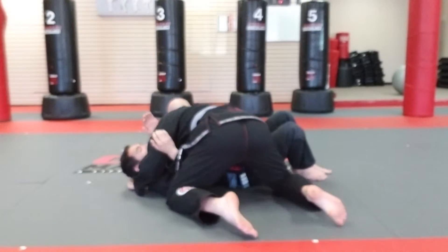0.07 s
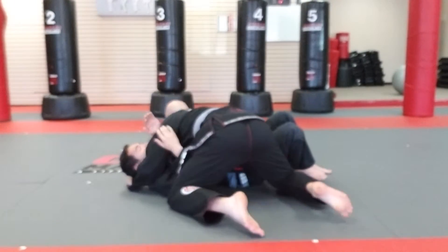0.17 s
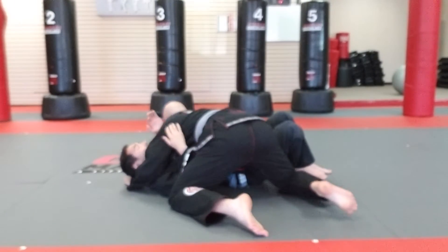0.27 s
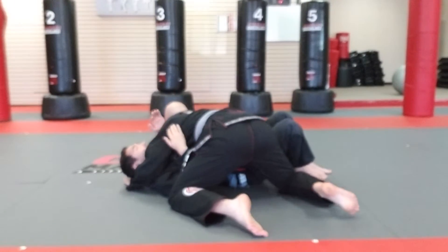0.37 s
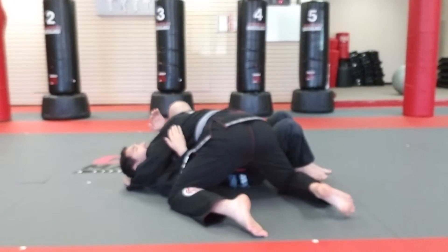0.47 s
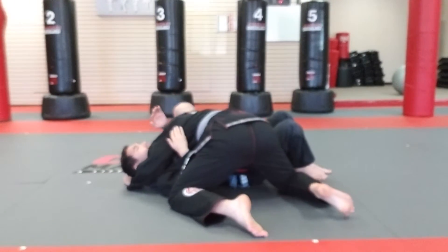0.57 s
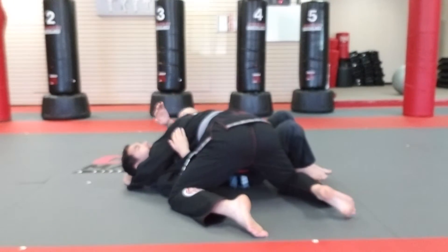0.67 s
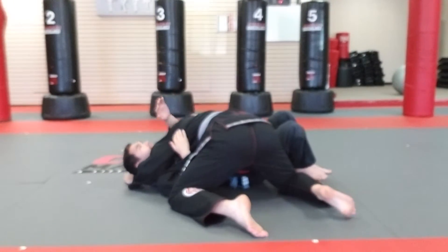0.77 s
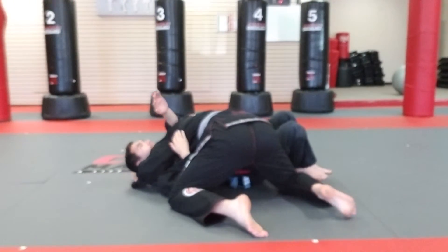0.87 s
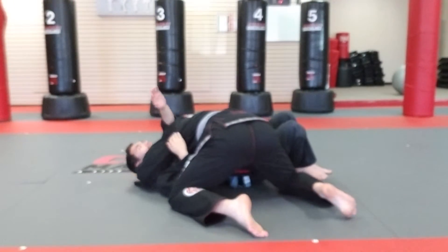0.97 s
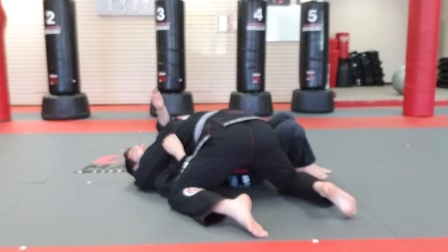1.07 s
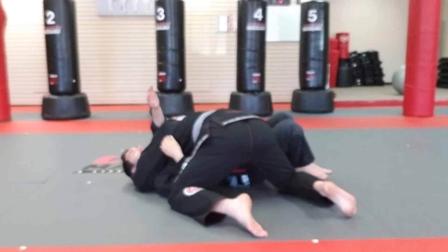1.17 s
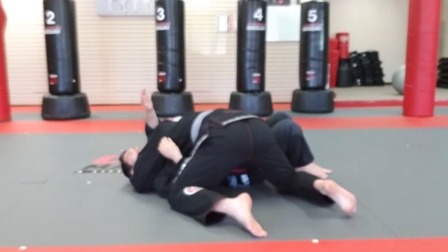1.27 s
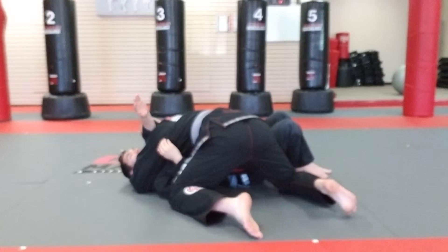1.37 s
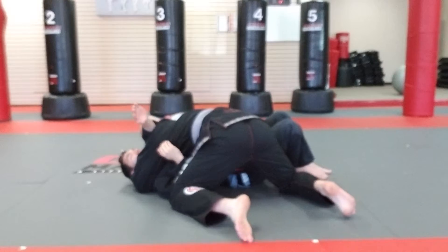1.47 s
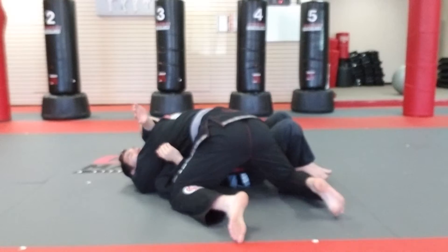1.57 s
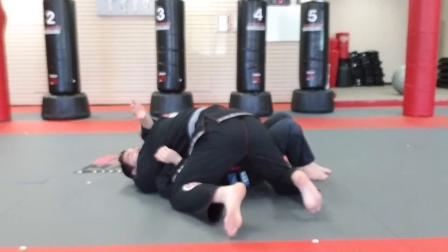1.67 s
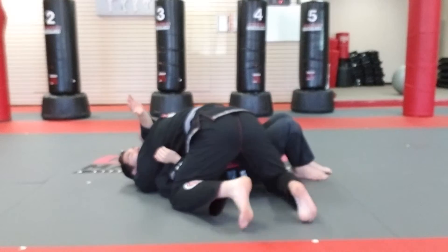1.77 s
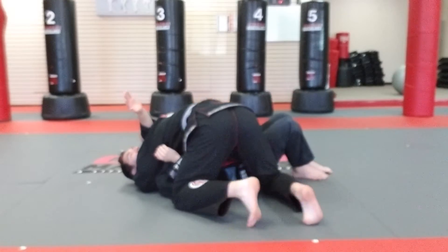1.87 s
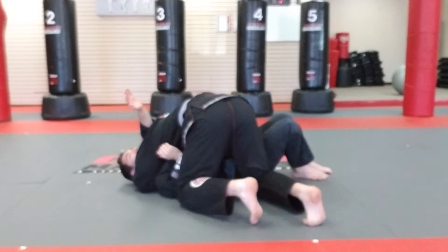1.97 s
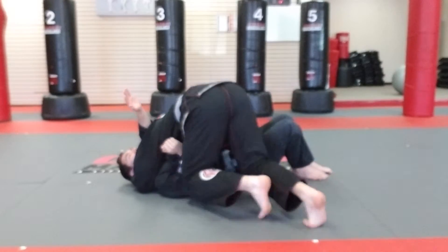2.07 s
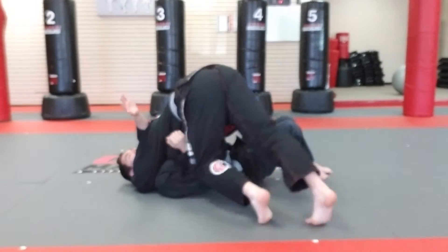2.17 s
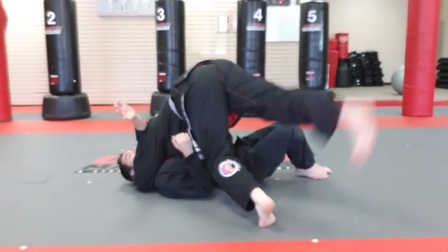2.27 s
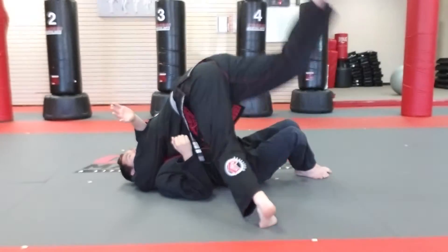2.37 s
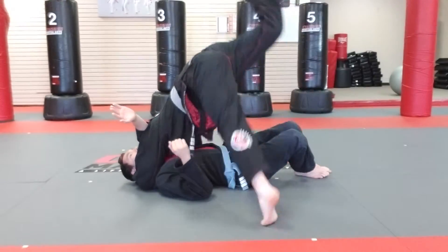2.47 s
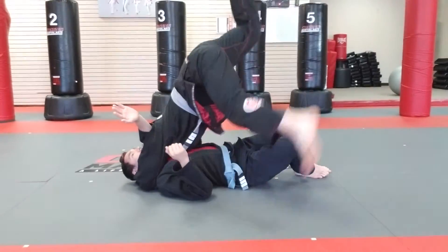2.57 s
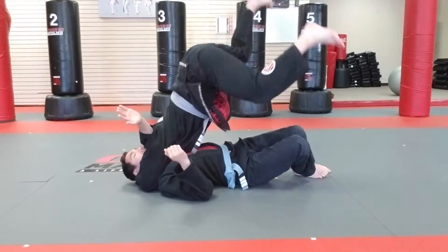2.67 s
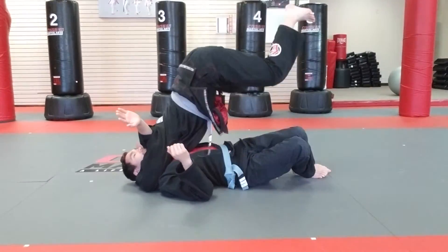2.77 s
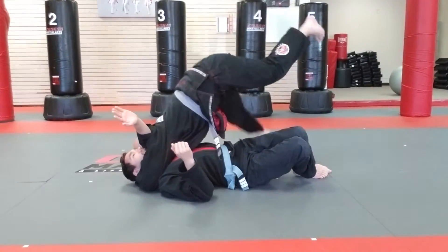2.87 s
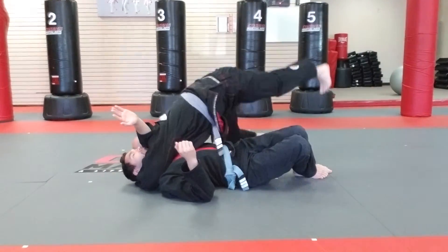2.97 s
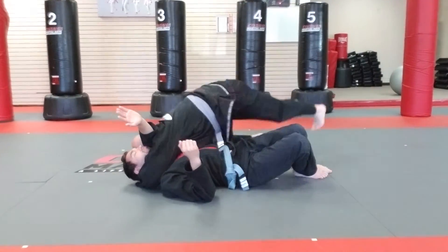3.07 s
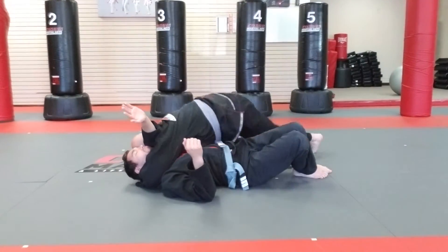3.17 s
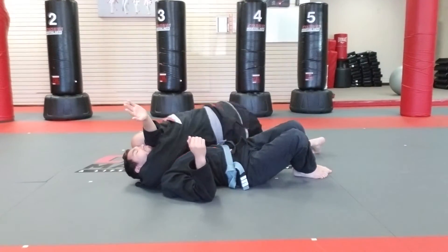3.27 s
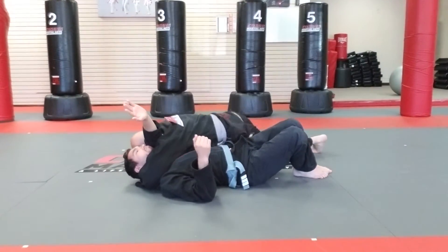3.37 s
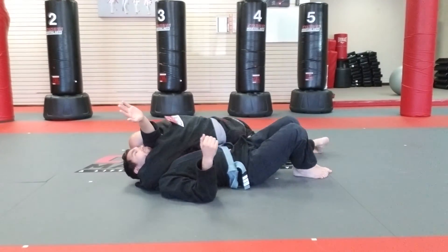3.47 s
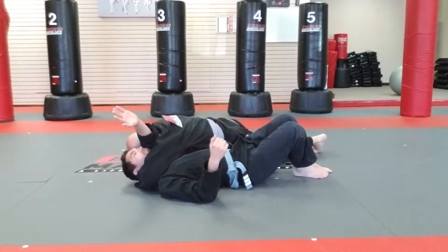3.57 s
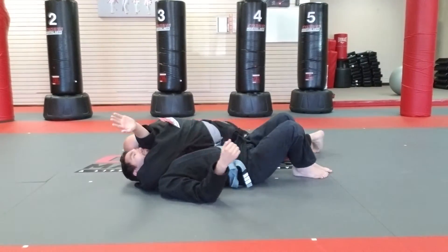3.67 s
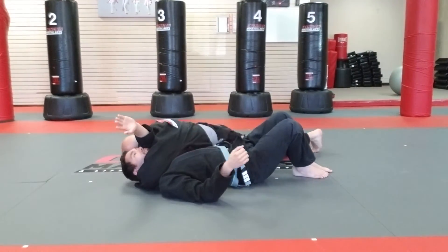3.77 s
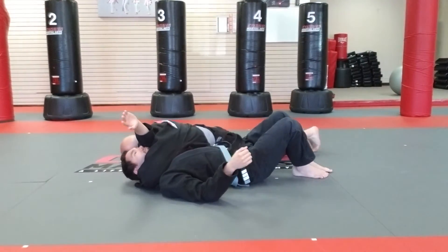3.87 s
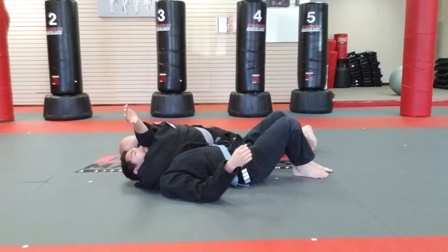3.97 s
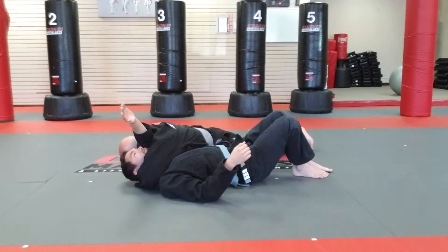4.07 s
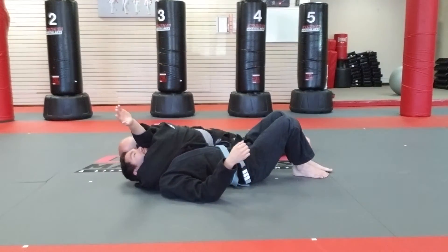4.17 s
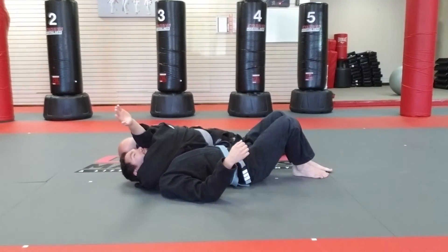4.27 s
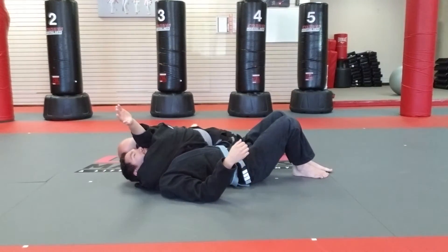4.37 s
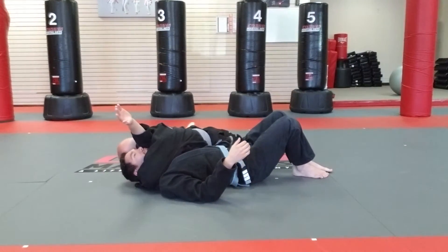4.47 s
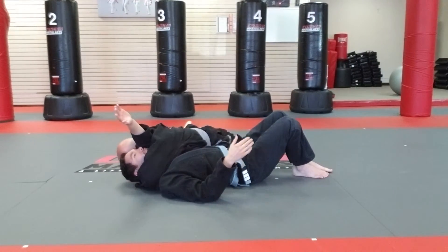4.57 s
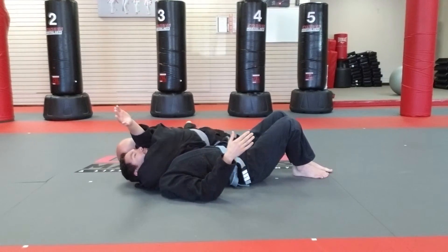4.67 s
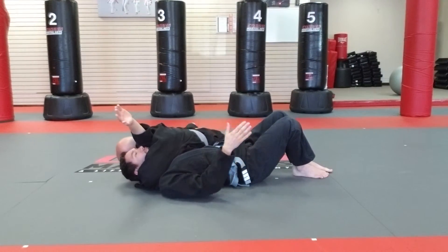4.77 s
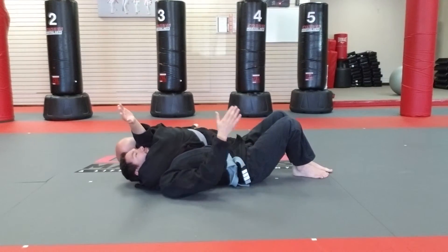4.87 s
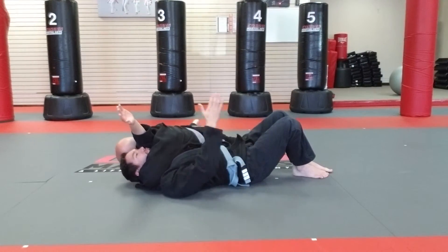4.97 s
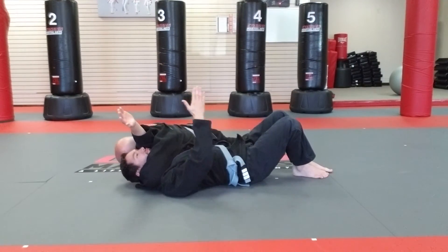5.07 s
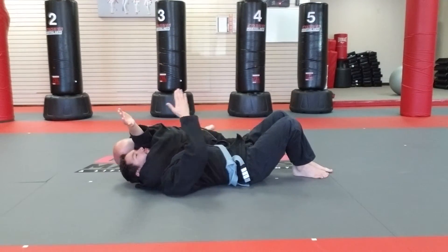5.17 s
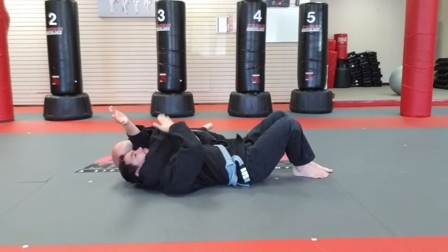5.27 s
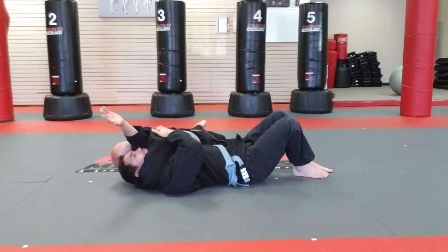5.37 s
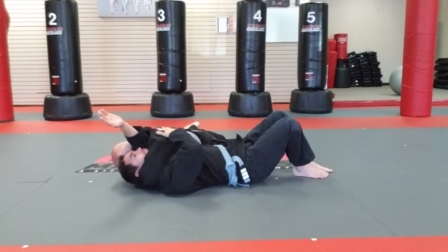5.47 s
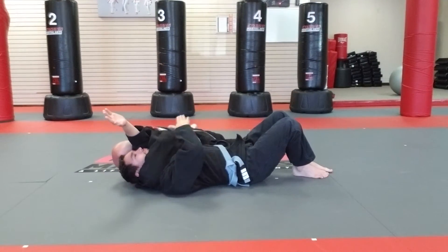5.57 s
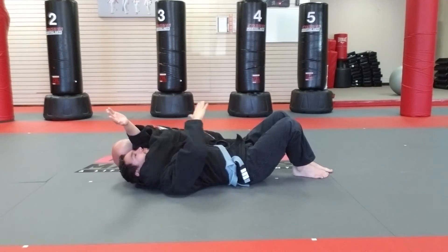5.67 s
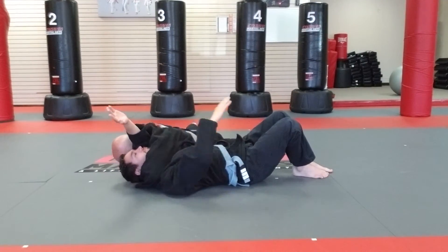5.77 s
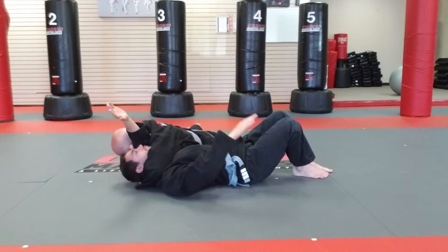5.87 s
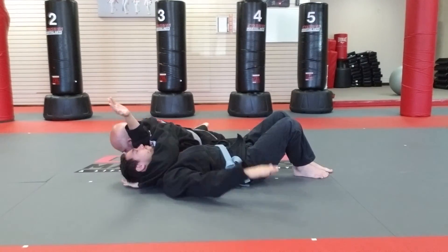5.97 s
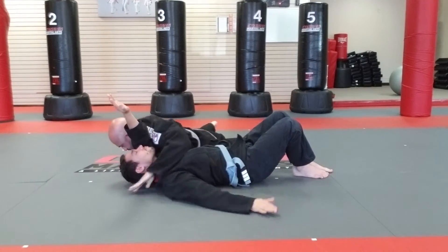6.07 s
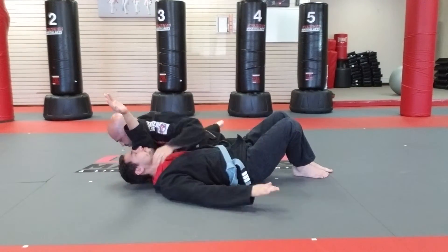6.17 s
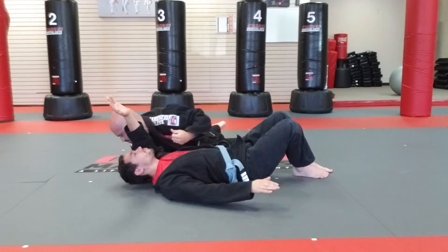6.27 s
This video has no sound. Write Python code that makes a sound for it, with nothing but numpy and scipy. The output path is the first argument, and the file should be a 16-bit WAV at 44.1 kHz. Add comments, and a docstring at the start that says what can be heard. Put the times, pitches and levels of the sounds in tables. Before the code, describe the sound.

A low ventilation hum with softly rushing air runs throughout in a gym. Heavy cotton jackets rub quietly from the start, with a faint bump at 1.3 seconds. From about 1.7 seconds, feet, knees and sleeves scuff across the padded mat and the rustling grows, with a light knock at 2.4 seconds. At 2.9 seconds a body lands with a loud, low thud and a slap, fluttering between floor and ceiling and ringing briefly in the room. A softer bump follows at 3.2 seconds, then a short scuff. The cloth keeps shifting until about 4 seconds, with a faint tap at 4.4 and a brief rub at 4.7. A hand lightly pats a jacket at 5.3 seconds. Just after 6 seconds a sleeve swishes and an arm drops flat on the mat with a loud, sharp smack and thud, echoing briefly over the hum.

```python
"""A body lands on a padded gym floor with a thud and a softer bump, as two people drill a roll.
Their heavy cotton jackets rub; feet, knees and sleeves slide. Later a hand pats a jacket and an arm
drops flat on the mat. The foam thuds under the landings; air squeezed from under cloth slaps.
Each blow flutters between floor and ceiling and rings in the room, over the low hum of ventilation."""
import sys
import numpy as np
from scipy import signal
from scipy.fft import rfft, irfft, next_fast_len
from scipy.io import wavfile

SR = 44100
rng = np.random.default_rng(int(sys.argv[2]) if len(sys.argv) > 2 else 0)


def waveform_to_disk(signal):
    """Save audio, clipped to [-1, 1], as 16-bit WAV at the path in sys.argv[1]."""
    frames = np.transpose(np.atleast_2d(signal))
    scaled = np.clip(frames, -1, 1) * 32767
    samples = np.round(scaled).astype(np.int16)
    wavfile.write(sys.argv[1], SR, samples)


N = 278491
TIME_S = np.arange(N) / SR
FFT_SIZE = next_fast_len(N + SR // 10, True)
BINS_HZ = np.fft.rfftfreq(FFT_SIZE, 1 / SR)
LEFT_RIGHT = np.array([[1], [-1]])


def from_db(db):
    """Decibels to gain."""
    return 10 ** (np.asarray(db) / 20)


def at_hz(table, hz, column=1):
    """Interpolate a table column over log frequency."""
    table = np.array(table)
    return np.interp(np.log(np.maximum(hz, 1)), np.log(table[:, 0]), table[:, column])


def add(track, start_s, sound):
    """Mix a sound into a track."""
    start = int(round(start_s * SR))
    part = sound[..., :max(N - start, 0)]
    track[..., start:start + part.shape[-1]] += part


def drift(rate_hz):
    """Low-passed random curve, standard deviation 1."""
    white = rfft(rng.standard_normal(FFT_SIZE))
    slow = irfft(white / (1 + (BINS_HZ / rate_hz) ** 2), FFT_SIZE)[:N]
    return slow / slow.std()


def lead_left(spectrum, hz, lead_s=0.000068):
    """Sound from the mat reaches the left microphone first."""
    return spectrum * np.exp(2j * np.pi * hz * lead_s / 2 * LEFT_RIGHT)


# Diffuse sound at the two microphones: freq_hz, correlation
COHERENCE = [(60, 0.83), (125, 0.9), (250, 0.89), (500, 0.42), (1000, 0.39), (2000, 0.46), (4000, 0.13),
             (15000, 0.063)]
def noise(colour, size=N):
    """Coloured stereo noise, rms 1: narrow in the bass, wide in the treble."""
    fft_size = next_fast_len(size, True)
    hz = np.fft.rfftfreq(fft_size, 1 / SR)
    gain = from_db(at_hz(colour, hz))
    spectra = rfft(rng.standard_normal((3, fft_size))) * gain / np.sqrt(np.mean(gain ** 2))
    correlation = at_hz(COHERENCE, hz)
    common = np.sqrt(correlation) * lead_left(spectra[0], hz)
    separate = np.sqrt(1 - correlation) * spectra[1:]
    return irfft(common + separate, fft_size)[:, :size]


# Motor and mains hum: pitch_hz, rms_db
HUM_TONES = [(37, -68.5), (59.4, -53.5), (119.6, -50), (177.4, -68), (237.5, -65), (531.7, -69), (648, -79)]
# Drone swells: time_s, level_db
DRONE_LEVELS = [(0.0, -59), (0.96, -55), (1.53, -45.5), (2.4, -48.5), (2.55, -63), (2.7, -46.5),
                (2.94, -47), (3.03, -49.5), (3.51, -46.5), (3.9, -44.5), (4.17, -48), (4.35, -43.5),
                (5.04, -44.5), (5.31, -47.5), (5.73, -45.1), (6.3, -64)]
# Drone partials: pitch_ratio, gain_db
DRONE_TONES = [(1, 0.5), (1.5, -17.5), (2, -22.5)]
# Air rush: freq_hz, relative_db
AIR_SPECTRUM = [(20, -15), (40, -3), (75, -3), (115, 0), (200, -5.5), (320, -9), (550, -16), (800, -22.5),
                (1500, -28), (4000, -38), (8000, -38), (10000, -47), (13000, -38), (16000, -44)]
def ventilation(drone_hz=90.6, sag_hz_per_s=0.27, waver_rad=0.078, air_db=-51):
    """Steady motor hum and a swelling, slowly sagging drone over rushing air."""
    hum = sum(from_db(rms_db) * np.sin(2 * np.pi * (pitch_hz * TIME_S + rng.random()))
              for pitch_hz, rms_db in HUM_TONES)
    phase = 2 * np.pi * np.cumsum(drone_hz - sag_hz_per_s * TIME_S) / SR
    phase += waver_rad * drift(rate_hz=2.7)
    swell = from_db(np.interp(TIME_S, *np.transpose(DRONE_LEVELS)))
    drone = swell * sum(from_db(gain_db) * np.sin(ratio * phase) for ratio, gain_db in DRONE_TONES)
    return np.sqrt(2) * (hum + drone) + from_db(air_db) * noise(AIR_SPECTRUM)


# Cloth rubbing under weight: freq_hz, relative_db
RUB_SPECTRUM = [(150, 6.5), (400, 4.5), (650, 0), (950, 0.5), (1400, -4), (2000, -3.5), (3300, -11),
                (5000, -11.5), (9000, -20)]
# Cloth swishing lightly: freq_hz, relative_db
SWISH_SPECTRUM = [(1200, -50), (2500, 0.5), (4000, 1.5), (5500, -4), (8000, 0), (9700, -9), (12500, 1),
                  (16000, -10.5)]
# Body and arm shifts: fastest_s, rise_s, fall_s, rub_db, swish_db
JACKET_MOVES = [(0.11, .25, 0.2, -50, -58.5), (0.89, 0.084, 0.11, -60.5, -72), (1.48, 0.11, 0.12, -66, -59),
                (1.84, 0.2, 0.15, -53, -55.5), (2.18, 0.2, 0.13, -51.5, -63), (2.35, .06, 0.068, -60, -66),
                (2.48, 0.07, 0.095, -51.5, -56), (2.62, 0.14, 0.22, -57.5, -62),
                (3.24, 0.1, 0.21, -49.5, -61), (3.801, 0.25, 0.17, -52, -63),
                (4.66, 0.11, 0.18, -55.5, -76), (5.0, 0.16, 0.25, -63.5, -77),
                (6.0, 0.18, 0.33, -52.5, -64)]
def jackets(grip_rub_db=-65, grip_swish_db=-72.5, let_go_s=3.6, fade_db_per_s=29):
    """Cotton slides in small jerks: folds catch, the weave adds grain. The grip rustles until let go."""
    grip = from_db(-fade_db_per_s * np.maximum(TIME_S - let_go_s, 0))
    rub, swish = from_db(grip_rub_db) * grip, from_db(grip_swish_db) * grip
    for fastest_s, rise_s, fall_s, rub_db, swish_db in JACKET_MOVES:
        width_s = np.where(TIME_S < fastest_s, rise_s, fall_s)
        speed = np.exp(-(np.abs(TIME_S - fastest_s) / width_s) ** 2.15)   # rounded bell
        rub = np.hypot(rub, from_db(rub_db) * speed)
        swish = np.hypot(swish, from_db(swish_db) * speed)
    fold_db, weave_db = 0.84 * drift(rate_hz=25), drift(rate_hz=400)
    catch_db = fold_db + weave_db
    return (rub * from_db(catch_db) * noise(RUB_SPECTRUM)
            + swish * from_db(catch_db / 2) * noise(SWISH_SPECTRUM))


# Foot, knee and sleeve slides: middle_s, level_db, half_width_s, centre_hz
SLIDES = [(0.19, -57, 0.045, 480), (1.714, -55, 0.011, 955), (1.8, -52.5, 0.064, 890),
          (1.865, -51, 0.054, 1920), (2.101, -53, 0.058, 380), (2.092, -54, 0.006, 1360),
          (2.421, -46, 0.0042, 480), (2.454, -47.5, 0.013, 430), (2.475, -60, 0.03, 13000),
          (2.577, -52.5, 0.0084, 1100), (2.605, -52.5, 0.015, 766), (3.272, -45, 0.021, 665),
          (3.783, -53, 0.035, 1030), (4.67, -58.5, 0.034, 2030), (5.95, -58.5, 0.033, 13100)]
def scuffs(grain_db=2, grain_hz=200, skirt_db=-16):
    """Each slide swells and fades in its own noise band, catching as it goes."""
    out, t = np.zeros((2, N)), TIME_S[:SR // 2]
    for middle_s, level_db, half_width_s, centre_hz in SLIDES:
        band = [(centre_hz / 4, -50), (centre_hz / 2, skirt_db), (centre_hz / 1.15, 0),
                (centre_hz * 1.15, 0), (centre_hz * 2, skirt_db), (centre_hz * 8, -50)]
        start_s = max(middle_s - t[-1] / 2, 0)
        swell = np.exp(-((start_s + t - middle_s) / half_width_s) ** 2 / 2)
        add(out, start_s, from_db(level_db) * swell * noise(band, size=len(t)))
    return out * from_db(grain_db * drift(grain_hz))


# Low thuds on the mat and their strongest ceiling echoes: start_s, level_db, pitch_hz, rise_s
THUD_PULSES = [(1.295, -37.5, 199, 0.0046), (1.347, -49, 203, 0.0057), (2.42, -37, 202, 0.0012),
               (2.886, -14.5, 215, 0.0019), (2.896, -16, 266, 0.003), (2.9078, -21, 73.6, 0.0081),
               (2.9234, -30, 218, 0.0021), (2.950, -25, 269, 0.0039), (3.159, -29, 213, 0.0047),
               (3.166, -34.5, 298, 0.0055), (5.3006, -40.5, 313, 0.0052), (6.0399, -18.5, 106.7, 0.005),
               (6.0479, -12.5, 191, 0.003), (6.098, -26.5, 172, 0.0047)]
def thuds():
    """Each mat thud or ceiling echo is a few heavily damped cycles, the pressure dipping first."""
    out, t = np.zeros(N), TIME_S[:SR // 4]
    for start_s, level_db, pitch_hz, rise_s in THUD_PULSES:
        swell = t / rise_s * np.exp(1 - t / rise_s)
        add(out, start_s, -from_db(level_db) * swell * np.sin(2 * np.pi * pitch_hz * t))
    return out


# Floor and ceiling echoes: delay_s, gain_db
FLUTTER_TAPS = [(.0235, -17), (.0335, -15), (.0525, -9), (.0735, -10), (.0975, -10.5), (.1185, -17),
                (.160, -21)]
def flutter(blows, cutoff_hz=900):
    """Distinct echoes, dulled by ceiling tiles and mats."""
    out = np.zeros_like(blows)
    dulled = signal.sosfilt(signal.butter(1, cutoff_hz, fs=SR, output="sos"), blows)
    for delay_s, gain_db in FLUTTER_TAPS:
        add(out, delay_s, from_db(gain_db) * dulled)
    return out


# Floor and room resonances: pitch_hz, gain_db, t60_s
ROOM_MODES = [(80.5, 2.5, 0.22), (175.3, -2.5, 0.22), (292.7, 6, 0.15), (339, 4, 0.26), (465, 17, 0.17),
              (635, 3, 0.43), (775, -16, .35)]
def boom(blows):
    """Low resonances ring on after a blow."""
    out = 0
    for pitch_hz, gain_db, t60_s in ROOM_MODES:
        radius = from_db(-60 / (t60_s * SR))
        feedforward = np.array([1, 0, -1]) * (1 - radius ** 2) / 2
        feedback = [1, -2 * radius * np.cos(2 * np.pi * pitch_hz / SR), radius ** 2]
        out += from_db(gain_db) * signal.lfilter(feedforward, feedback, blows + 1e-18)
    return out


# Diffuse gym tail: freq_hz, t60_s, gain_db
REVERB_BANDS = [(60, 0.64, -15), (177, 0.84, -6), (450, 0.56, 4), (1170, 0.29, 4.5), (4200, 0.47, 3.5),
                (15000, 0.29, 3.5)]
def gym_reverb(blows, build_up_s=0.00067):
    """The diffuse tail builds up, then dies band by band."""
    t, response = TIME_S[:SR], 0
    white = rfft(noise([(20, 0), (20000, 0)], size=SR)) / np.sqrt(SR)
    hz = np.fft.rfftfreq(SR, 1 / SR)
    edges_hz = np.geomspace(30, 20000, 12)
    for low_hz, high_hz in zip(edges_hz, edges_hz[1:]):
        centre_hz = np.sqrt(low_hz * high_hz)
        t60_s, gain_db = at_hz(REVERB_BANDS, centre_hz), at_hz(REVERB_BANDS, centre_hz, column=2)
        fade = (1 - np.exp(-t / build_up_s)) * from_db(-60 * t / t60_s)
        band = irfft(white * ((hz >= low_hz) & (hz < high_hz)), SR)
        response += from_db(gain_db) * band * fade / np.sqrt(np.mean(fade ** 2))
    return signal.fftconvolve(blows[None], response, axes=1)[:, :N]


# Base slap colour: freq_hz, relative_db
SLAP_SPECTRUM = [(150, -7), (400, 1), (800, 1), (1500, -3.5), (3000, -3.5), (5000, -8.5), (7500, -7),
                 (9700, -16.5), (12500, -8.5), (16000, -16.5)]
# Cloth and skin smacks: start_s, level_db, decay_s, tilt_db_per_octave, pocket_hz, room_send_db
SLAP_HITS = [(2.4222, -38, 0.0022, -1.5, 1020, -2.5), (2.886, -21, 0.0025, -3, 1320, -7),
             (2.896, -33, 0.024, -3, 740, -1.5), (2.904, -42.5, 0.029, 3, 3220, 3.5),
             (3.160, -55.5, 0.058, -3.8, 1150, 7.5), (4.381, -44, 0.0047, -9.5, 794, -1),
             (5.290, -46, 0.014, -3, 1600, -2), (5.3012, -30.5, 0.0051, -4.5, 1480, -4),
             (5.3077, -34, 0.0047, -3.5, 1490, -5), (5.326, -41, 0.01, -4, 1300, -10),
             (6.0302, -28, 0.0052, -2.5, 1490, -25), (6.0403, -15, 0.00097, 0, 1900, -11.5),
             (6.0469, -21, 0.0027, -1.5, 1700, -4.5), (6.239, -48.5, 0.0029, -0.5, 2570, -3)]
def slaps(attack_s=0.0002, pocket_db=5, pocket_octaves=0.36):
    """Air squeezed from between cloth and vinyl, coloured by its pocket. Returns direct and room send."""
    out, t = np.zeros((2, N)), TIME_S[:SR // 2]
    hz = np.maximum(np.fft.rfftfreq(len(t), 1 / SR), 100)
    for start_s, level_db, decay_s, tilt_db_per_octave, pocket_hz, room_send_db in SLAP_HITS:
        octaves = np.log2(hz / pocket_hz)
        resonance_db = pocket_db * np.exp(-(octaves / pocket_octaves) ** 2 / 2)
        colour = from_db(at_hz(SLAP_SPECTRUM, hz) + tilt_db_per_octave * octaves + resonance_db)
        envelope = (1 - np.exp(-t / attack_s)) * np.exp(-t / decay_s)
        # Random phase, smooth magnitude.
        phase = np.angle(rfft(envelope * rng.standard_normal(len(t))))
        burst = irfft(colour * np.exp(1j * phase), len(t))[:len(t) // 2]
        burst *= from_db(level_db) * np.sqrt(np.sum(envelope ** 2) / np.sum(burst ** 2))
        add(out, start_s, np.array([burst, from_db(room_send_db) * burst]))
    return out


def scene(thud_reverb_db=-3):
    """Blows with their echoes, plus cloth and ventilation."""
    thud = thuds()
    slap, slap_send = slaps()
    reflected = flutter(thud + slap_send) + boom(thud + slap_send)
    near_spectrum = rfft(thud + slap + reflected, FFT_SIZE)
    near = irfft(lead_left(near_spectrum, BINS_HZ), FFT_SIZE)[:, :N]
    tail = gym_reverb(from_db(thud_reverb_db) * thud + slap_send)
    return near + tail + jackets() + scuffs() + ventilation()


# Microphone balance: freq_hz, left_minus_right_db
MIC_BALANCE = [(60, 0), (250, -1), (1000, -1.9), (3400, -3.5), (5500, 2.5), (7400, .5), (8600, 8),
               (10200, -4), (12700, 2), (16000, -8)]
def record(dry, low_cut_hz=30, high_cut_hz=15900):
    """Each microphone has its own colour; deep bass and top treble are cut."""
    balance = from_db(at_hz(MIC_BALANCE, BINS_HZ) / 2 * LEFT_RIGHT)
    coloured = irfft(rfft(dry, FFT_SIZE) * balance, FFT_SIZE)[:, :N]
    low_cut = signal.butter(2, low_cut_hz, "high", fs=SR, output="sos")
    high_cut = signal.ellip(10, 0.2, 70, high_cut_hz, fs=SR, output="sos")
    return signal.sosfilt(high_cut, signal.sosfilt(low_cut, coloured))


dry = scene()
out = record(dry)
waveform_to_disk(out)
```